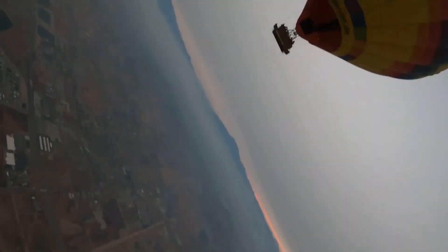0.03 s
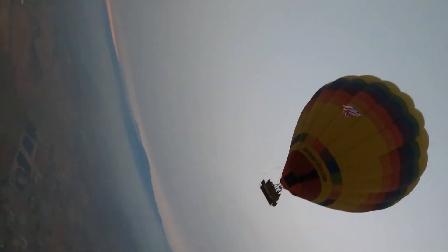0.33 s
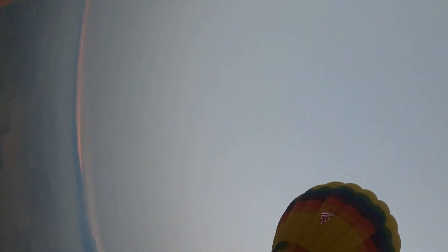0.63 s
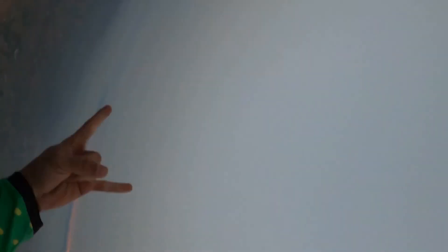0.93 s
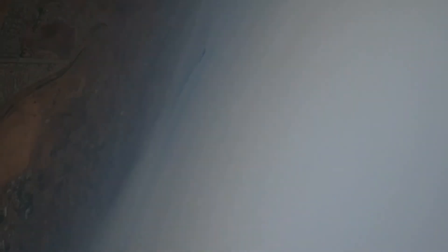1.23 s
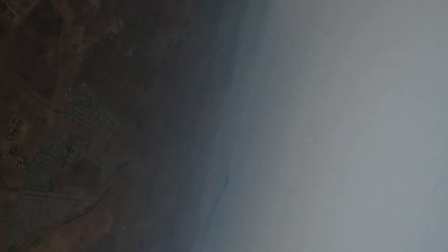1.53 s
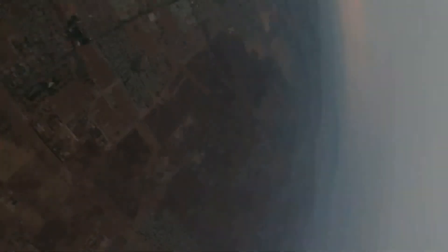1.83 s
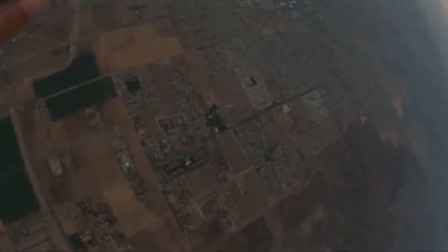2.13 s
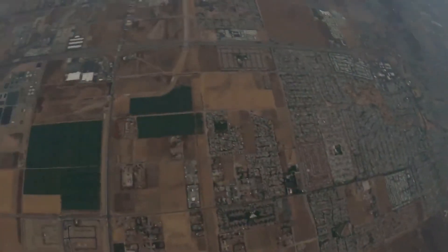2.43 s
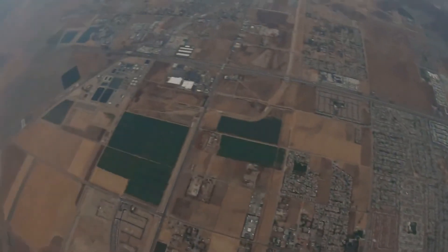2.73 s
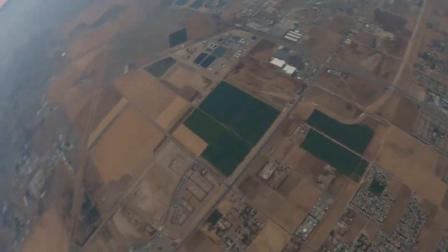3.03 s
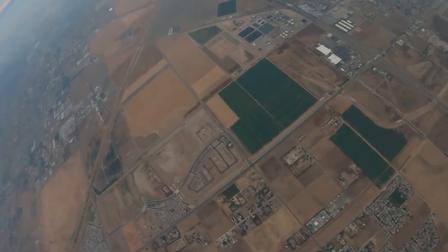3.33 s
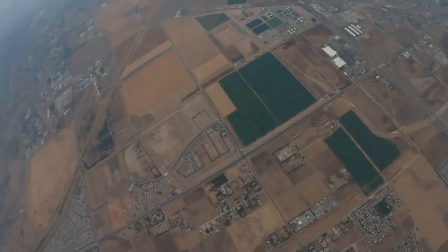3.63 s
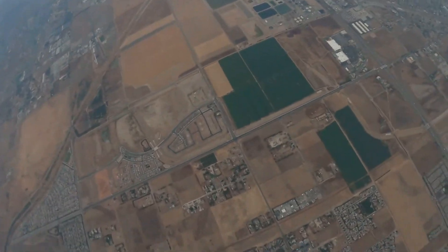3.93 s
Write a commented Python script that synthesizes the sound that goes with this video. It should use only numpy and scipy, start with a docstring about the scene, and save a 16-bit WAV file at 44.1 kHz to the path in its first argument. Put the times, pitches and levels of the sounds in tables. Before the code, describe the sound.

Wind buffets the microphone in freefall, then swells into a bright, steady rush.

```python
"""Freefall in open air, from the microphone of a camera carried by a tumbling skydiver.
At first eddies rumble right on the capsule, ragged gusts slap it and the housing snaps, with brief
rustles and one short knock. From about 1.2 s the microphone is in the lee: a thin hiss over the rumble,
then a strong double buffet of wind at 2.2 s. It turns into the full airstream, which swells to a bright,
steady rush, with a very faint whistle near 2.7 s, and grows duller in the last half second."""
import sys
import numpy as np
from scipy import signal
from scipy.fft import rfft, irfft
from scipy.io import wavfile
from scipy.ndimage import uniform_filter1d, minimum_filter1d, map_coordinates

SR = 44100
rng = np.random.default_rng(int(sys.argv[2]) if len(sys.argv) > 2 else 0)


def file_out(sig):
    """Save sig as 16-bit WAV at sys.argv[1]."""
    # one column per channel
    cols = np.atleast_2d(sig).T
    # limit, then scale
    lim = np.clip(cols, -1, 1)
    pcm = np.round(lim * 32767).astype(np.int16)
    wavfile.write(sys.argv[1], SR, pcm)


N = 4 * SR

# strength of the eddies at the microphone: t/s, level/dB
EDDY_LEVELS = [(0,-13),(.12,-20.5),(.21,-10),(.33,-18.5),(.55,-17),(.64,-12.5),(.675,-25),(.71,-14.5),(.76,-21),(.85,-14),(.96,-14),(1.08,-10),(1.2,-18.5),(1.4,-20),(1.86,-17),(1.95,-20),(2.14,-21.5),(2.215,-12.5),(2.24,-15),(2.262,-34),(2.37,-34),(2.41,-20.5),(3.0,-22),(3.12,-14),(3.4,-24),(4,-22)]
# rate at which they are shed: t/s, f/Hz
SHEDDING_RATES = [(0,65.16),(.2,84.17),(.38,58.05),(.56,74.6),(.74,43.77),(.94,44.41),(1.05,96.7),(1.25,56.1),(1.78,78.3),(1.89,51.67),(2.05,62.15),(2.2,77.9),(2.44,49.84),(2.7,71.9),(3.25,88.1),(3.6,65.04)]
# rumble around the eddies at the reference shedding rate: f/Hz, relative level/dB
RUMBLE_SPECTRUM = [(22,-8),(42,-0.5),(100,-1),(150,-8.5),(220,-15),(400,-20.5),(700,-35.5),(1400,-41.5),(3000,-100)]
# gusts on the capsule: start/s, length/s, level/dB, roll-off/Hz
GUST_HITS = [(0,0.047,-12,1250),(0.056,0.062,-15,1550),(0.123,0.18,-17,1550),(0.31,0.031,-19.5,1750),
             (.332,0.052,-25,1050),(0.388,0.084,-21.5,930),(.472,0.076,-11,460),(.542,0.0086,-9.5,1650),(0.562,0.058,-14.5,500),
             (0.632,0.019,-13,1200),(0.663,0.066,-21,1050),(0.738,.07,-30.5,800),(0.811,.012,-15,750),(0.842,0.032,-16,1100),(.943,0.025,-16,520),
             (1.002,.028,-15.5,1900),(1.031,0.059,-19,1350),(1.115,0.048,-19.5,620),(2.157,0.016,-14,450),(2.178,0.0541,-11,1080)]
# gust turbulence before its roll-off: f/Hz, relative level/dB
GUST_SPECTRUM = [(30,-28),(70,-5.5),(120,1),(230,0.5),(800,-8.5),(1200,-7.5),(2200,-11),(3400,-2),(6000,-19.5),(15000,-50.5)]
# air sliding past the camera: t/s, level/dB
HISS_LEVELS = [(0,-49.5),(.7,-59),(.85,-49),(.98,-51.5),(1.04,-34.5),(1.11,-34.5),(1.19,-45),(1.6,-37.5),(1.7,-32.5),(1.82,-32),(1.89,-39),(1.95,-30),(2.05,-32),(2.14,-35.5),(2.225,-33.5),(2.25,-47.5),(2.36,-39.5),(2.75,-35.5),(4,-36)]
# colour of that hiss: f/Hz, relative level/dB
HISS_SPECTRUM = [(30,-14.5),(150,-19),(400,10.5),(700,6.5),(1100,2),(2000,-0.5),(3500,-4.5),(7300,-19.5),(12000,-36.5),(15000,-58)]
# snaps and bumps on the housing: t/s, level/dB, roll-off/Hz
HOUSING_SNAPS = [(.017,-9,2200),(.033,-12.5,2200),(0.06,-27,3700),(0.068,-14.5,2700),(0.099,-16.5,4600),(.108,-14.5,3800),(.133,-21,4900),(.168,-10,3300),(.178,-14,2200),(.184,-13.5,4900),
                 (.207,-15,3700),(0.223,-19,4800),(.233,-18,4300),(0.261,-13,1700),(.271,-20,4200),(.284,-15,4700),(0.307,-21,3900),(.316,-19,4200),(0.325,-12.5,1600),
                 (0.427,-10.5,1400),(.443,-27.5,2600),(0.546,-20.5,3400),(.569,-24,2400),(.610,-15.5,800),(0.624,-12,1950),(0.637,-15.5,2250),(.660,-22.5,2600),(.677,-14,1650),(.713,-13,1650),(.857,-18,2400),(0.886,-12,1000),(0.95,-15.5,1000),
                 (1.014,-15,4200),(1.048,-12,6500),(1.068,-18,7000),(1.071,-13,3400),(1.080,-26,11000),(1.089,-25,5000),(1.108,-20,5000),(1.138,-22,9500),(1.842,-15.5,10000),(1.849,-13,6500),(1.851,-11.5,3000),
                 (2.203,-20.5,9000),(2.221,-19,6500),(2.227,-10.5,1300),(2.665,-13.5,2700),(2.714,-14,3600),(3.786,-12,5500),(3.883,-12,4200)]
# a snap before its roll-off: f/Hz, relative level/dB
SNAP_SPECTRUM = [(60,-38.5),(300,8.5),(1000,0),(3800,-6),(7000,-14),(11000,-32),(15000,-39.5)]
# rustles and one knock near the microphone: centre/s, half length/s, level/dB, f/Hz, width/octaves
RUSTLES_AND_KNOCK = [(0.528,0.015,-47.5,4100,0.073),(0.531,0.031,-48.5,2800,0.63),(.712,0.013,-32,1580,.22),(1.01,0.012,-35,3180,0.36),(1.085,0.016,-39,4780,0.46)]
# the full airstream, head-on: t/s, level/dB, roll-off/Hz
AIRSTREAM_COURSE = [(2.24,-70,600),(2.32,-28,814),(2.45,-29,815.5),(2.57,-19.5,962),(2.615,-16,1090),(2.71,-14.5,1680),(2.78,-15.5,3660),(2.9,-15.5,5531),(3.0,-16,8220),(3.17,-15,9090),(3.42,-17,9270),(3.53,-16,4800),(3.71,-16,4616),(3.83,-17,3503),(3.92,-15,1944),(4,-15.5,1738)]
# the airstream before its roll-off: f/Hz, relative level/dB
AIRSTREAM_SPECTRUM = [(30,-15.5),(70,-16),(120,4),(200,2),(300,-1),(600,-4.5),(1100,-5),(2000,-10.5),(3400,-11.5),(5400,-15),(7300,-21.5),(11000,-35),(15000,-52)]


def undb(db):
    """Decibels to gain."""
    return 10 ** (np.asarray(db) / 20)


def curve(rows, column=1):
    """One column of a table, joined by straight lines in time."""
    rows = np.array(rows, float)
    return np.interp(np.arange(N) / SR, rows[:, 0], rows[:, column])


def wander(rate_hz):
    """Smooth random motion that changes about rate_hz times a second, rms 1."""
    f = np.fft.rfftfreq(N, 1 / SR)
    motion = irfft(rfft(rng.standard_normal(N)) * np.exp(-(f / rate_hz) ** 2), N)
    return motion / motion.std()


def noise(spectrum):
    """Noise with a given spectrum, rms 1."""
    hz, db = np.array(spectrum, float).T
    f = np.fft.rfftfreq(N, 1 / SR)
    gain = undb(np.interp(np.log(f + 1), np.log(hz), db))
    coloured = irfft(rfft(rng.standard_normal(N)) * gain, N)
    return coloured / coloured.std()


def roll_gain(hz, corner_hz, corner_loss_db=9):
    """Gain of turbulence at this frequency: the small, fast eddies die out first."""
    return undb(-corner_loss_db * np.minimum((hz / corner_hz) ** 1.41, 20))


def roll_off(x, corner_hz):
    """Apply a moving roll-off in overlapping bands."""
    centres = np.geomspace(100, 15000, 14)
    f = np.fft.rfftfreq(N, 1 / SR)
    band_index = np.interp(np.log(f + 1), np.log(centres), np.arange(len(centres)))
    spectrum = rfft(x)
    out = np.zeros(N)
    for k, hz in enumerate(centres):
        band = irfft(spectrum * np.maximum(1 - abs(band_index - k), 0), N)
        out += band * roll_gain(hz, corner_hz)
    return out


def steady(x, span_s):
    """Even out the strength of a noise over span_s."""
    window = np.hanning(int(2 * span_s * SR) + 3)
    power = signal.fftconvolve(x ** 2, window, mode="same") / (span_s * SR)
    return x / np.sqrt(abs(power) + 1e-9)


def swish(centre_s, half_s, db, hz, octaves):
    """A bell-shaped band of noise that swells and fades."""
    offsets = np.linspace(-4, 4, 17)
    bell = np.column_stack([hz * 2 ** (octaves * offsets), -10 / np.log(10) * offsets ** 2])
    swell = np.exp(-((np.arange(N) / SR - centre_s) / half_s) ** 2)
    return undb(db) * swell * noise(bell)


def eddies(scatter=.18, reference_hz=67.02, rumble_db=5):
    """Irregularly shed vortices rock the diaphragm; the rumble's pitch follows their rate."""
    rate = curve(SHEDDING_RATES)
    hz = rate * np.exp(scatter * wander(35.6))
    push = np.sin(2 * np.pi * np.cumsum(hz) / SR)
    read_position = np.cumsum(rate / reference_hz)
    rumble = map_coordinates(noise(RUMBLE_SPECTRUM), [read_position], mode="grid-wrap")
    pressure = push / push.std() + undb(rumble_db) * rumble
    return undb(curve(EDDY_LEVELS)) * steady(pressure, span_s=.056)


def gusts(attack_s=.006, release_s=.0063, flutter_db=3.5, raggedness=.066):
    """Bursts of turbulence slap the capsule; each flutter in them is both louder and brighter."""
    t = np.arange(N) / SR
    power, corner, weight = np.zeros((3, N))
    for start, length, db, hz in GUST_HITS:
        rise = np.clip((t - start) / attack_s + .5, 0, 1)
        fall = np.exp(-np.clip((t - start - length) / release_s, 0, 20))
        envelope = rise * fall
        power += (undb(db) * envelope) ** 2
        corner += hz * envelope
        weight += envelope
    # overlapping gusts average their roll-offs; a fading gust dulls
    corner = (corner + 1) / np.maximum(weight, np.sqrt(weight) + 1e-9)
    flutter = wander(150)
    corner *= np.exp(raggedness * flutter)
    return roll_off(noise(GUST_SPECTRUM), corner) * np.sqrt(power) * undb(flutter_db * flutter)


def hiss(waver_db=.57):
    """Air slides along the housing with a smooth, thin hiss."""
    return noise(HISS_SPECTRUM) * undb(curve(HISS_LEVELS) + waver_db * wander(14))


def snaps(attack_s=.00026, decay_s=.0024, reference_hz=3000):
    """Dead, ringless cracks on the housing; those duller than reference_hz outlast decay_s."""
    size = 4096
    onset = size // 2  # each crack starts mid-block, leaving room for the filter to spread it
    t = np.maximum(np.arange(size) - onset, 0) / SR
    f = np.fft.rfftfreq(size, 1 / SR)
    out = np.zeros(N + 2 * size)
    source = noise(SNAP_SPECTRUM)
    for start, db, hz in HOUSING_SNAPS:
        i = int(start * SR)
        decay_rate = (hz / reference_hz) ** .44 / decay_s
        envelope = (1 - np.exp(-t / attack_s)) * np.exp(-t * decay_rate)
        crack = source[i:i + size] * envelope
        crack *= envelope.std() / envelope.max() / crack.std()  # rms about 1 at the crest
        out[i:i + size] += undb(db) * irfft(rfft(crack) * roll_gain(f, hz), size)
    return out[onset:onset + N]


def rustles_and_knock():
    """Brief rustles and one short knock near the microphone, each a swell of band noise."""
    return sum(swish(*row) for row in RUSTLES_AND_KNOCK)


def airstream(flutter_db=.37, raggedness=.072):
    """The steady rush brightens as the microphone faces into the flow."""
    flutter = wander(90)
    corner = curve(AIRSTREAM_COURSE, column=2) * np.exp(raggedness * flutter)
    gain = undb(curve(AIRSTREAM_COURSE) + flutter_db * flutter)
    return roll_off(noise(AIRSTREAM_SPECTRUM), corner) * gain


def whistle():
    """Air passing over an edge gives one brief, thin whistle."""
    return swish(centre_s=2.665, half_s=.065, db=-67, hz=9540, octaves=.008)


def scene():
    """Everything at or close to one microphone, in open air with no reflections."""
    wind = eddies() + gusts() + hiss() + snaps() + rustles_and_knock() + airstream() + whistle()
    return wind[None]


def record(dry, ceiling_db=-4.0, top_hz=14400):
    """The camera's fast limiter holds the strongest buffets down; the top is cut."""
    span = 256  # samples
    gain = np.minimum(1, undb(ceiling_db) / (abs(dry) + 1e-9))
    held = minimum_filter1d(gain, 2 * span)
    smoothed = uniform_filter1d(uniform_filter1d(held, span), span)
    low_pass = signal.ellip(8, .2, 70, top_hz, fs=SR, output="sos")
    return signal.sosfilt(low_pass, dry * smoothed)


dry = scene()
out = record(dry)
file_out(out)
```